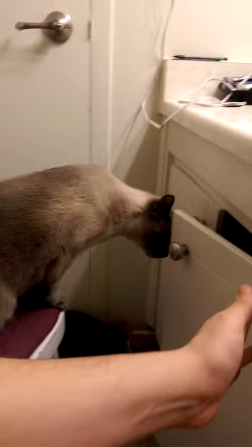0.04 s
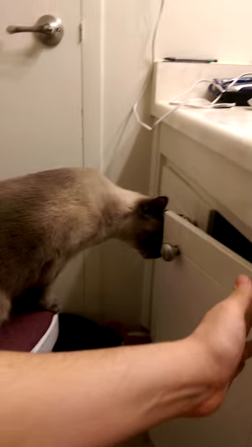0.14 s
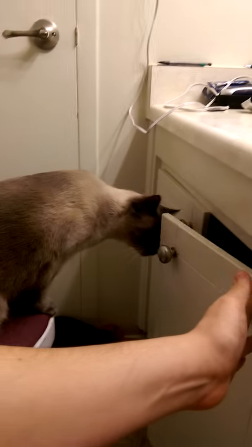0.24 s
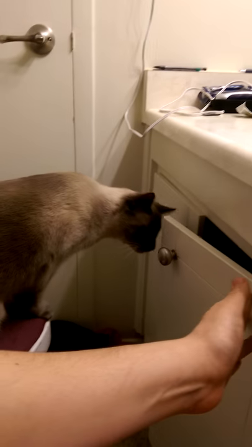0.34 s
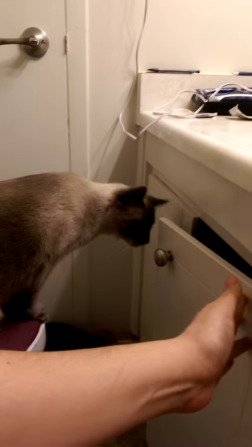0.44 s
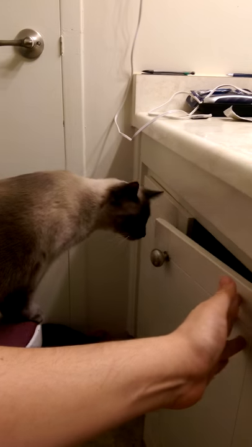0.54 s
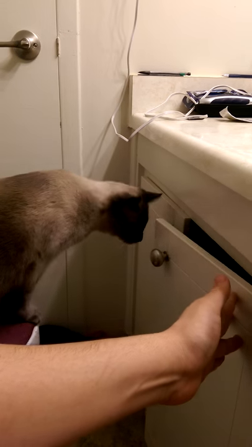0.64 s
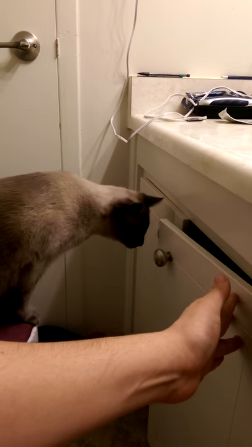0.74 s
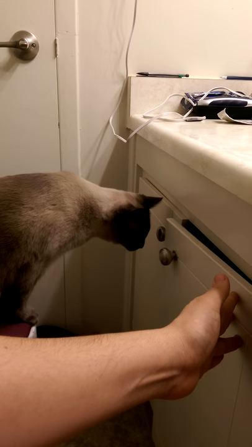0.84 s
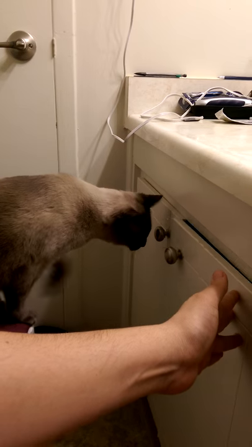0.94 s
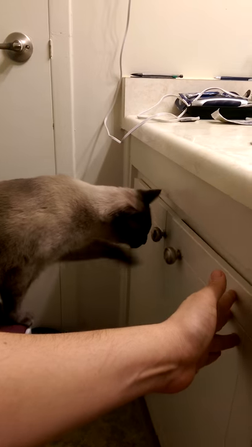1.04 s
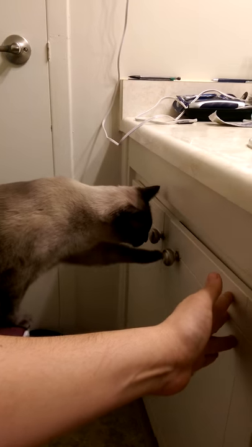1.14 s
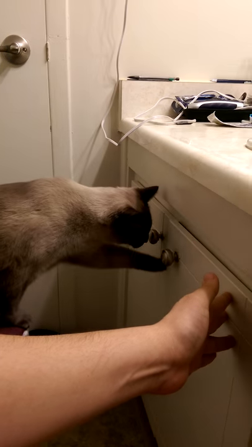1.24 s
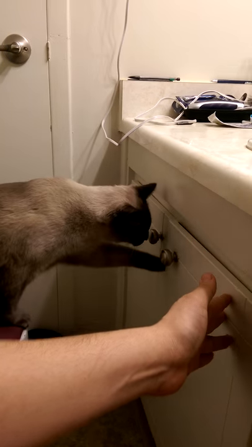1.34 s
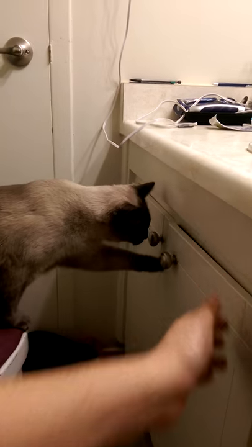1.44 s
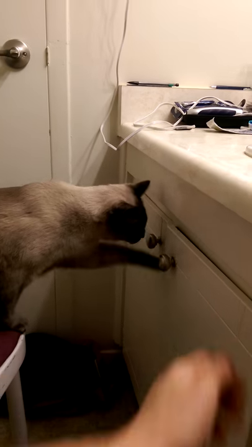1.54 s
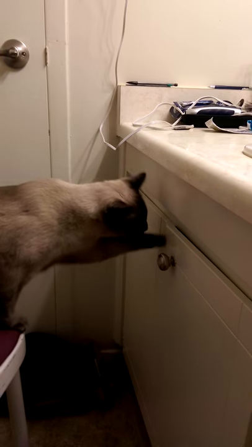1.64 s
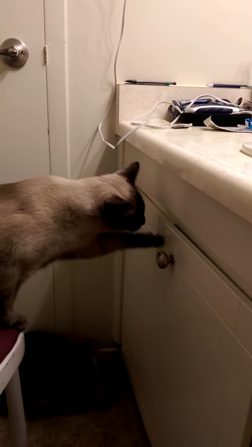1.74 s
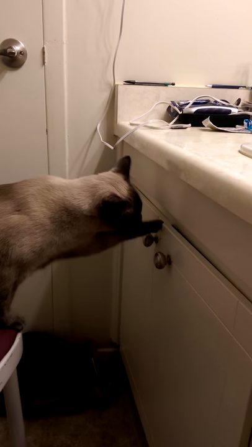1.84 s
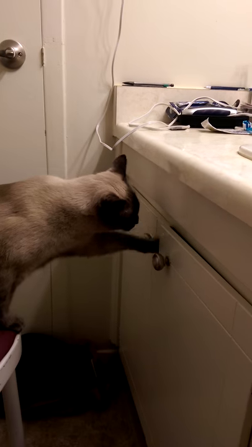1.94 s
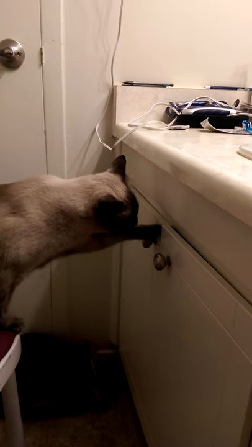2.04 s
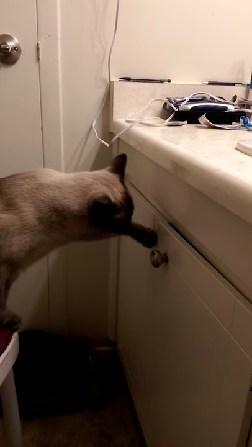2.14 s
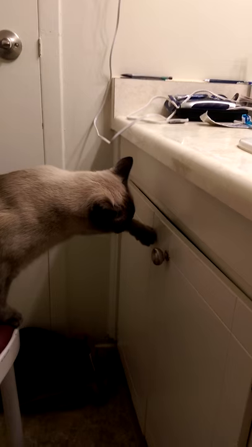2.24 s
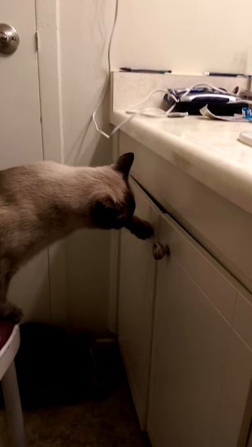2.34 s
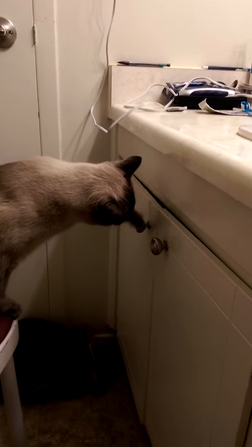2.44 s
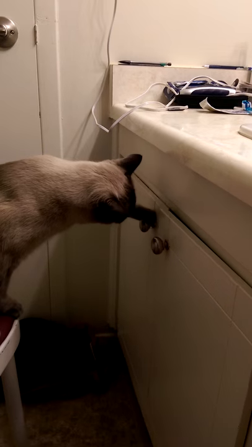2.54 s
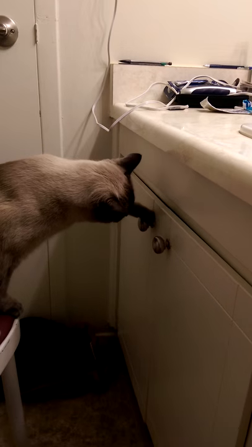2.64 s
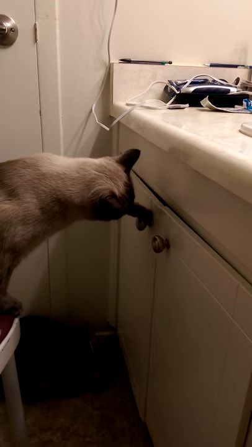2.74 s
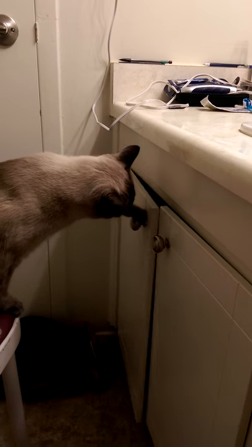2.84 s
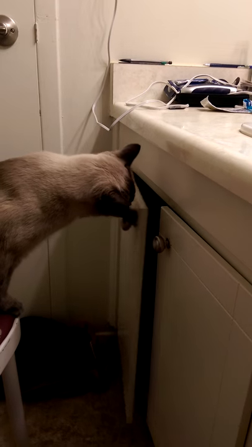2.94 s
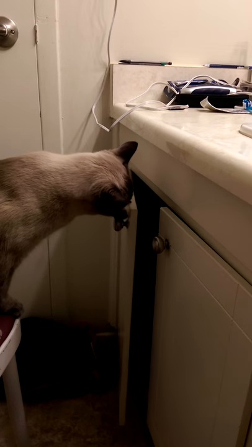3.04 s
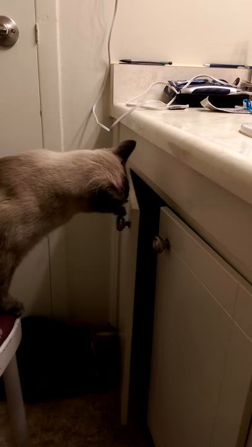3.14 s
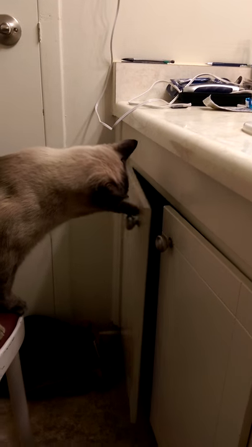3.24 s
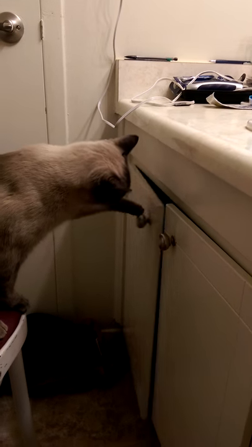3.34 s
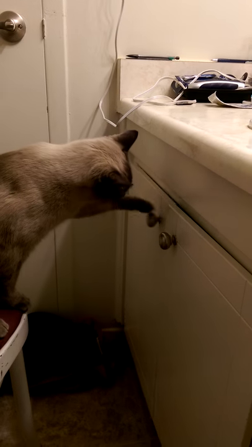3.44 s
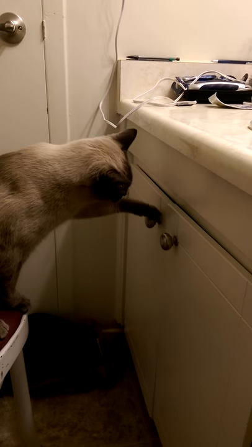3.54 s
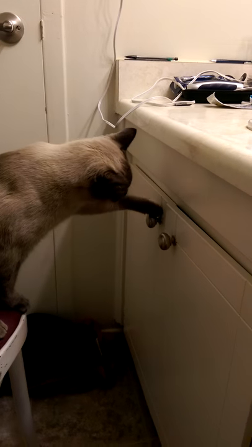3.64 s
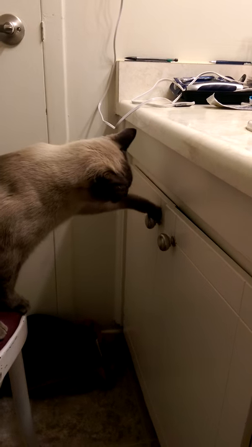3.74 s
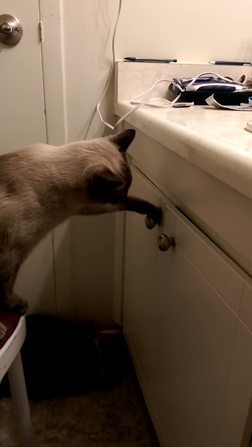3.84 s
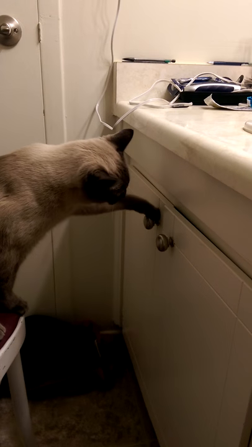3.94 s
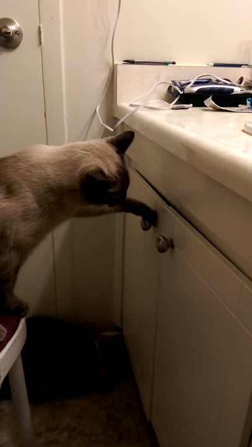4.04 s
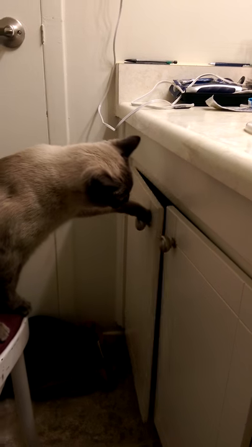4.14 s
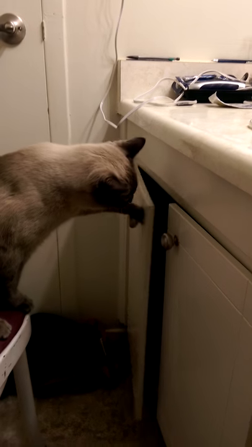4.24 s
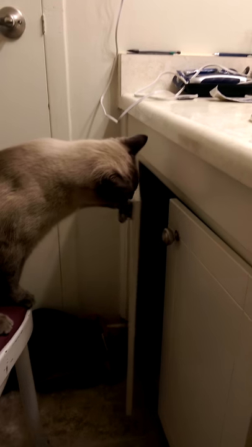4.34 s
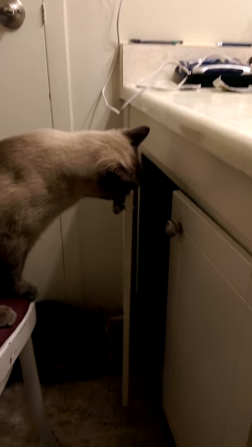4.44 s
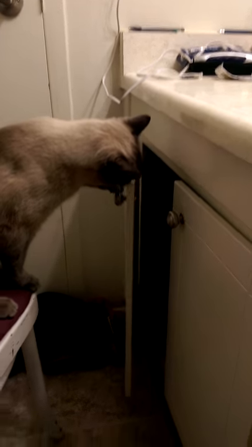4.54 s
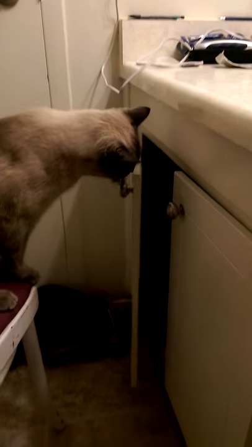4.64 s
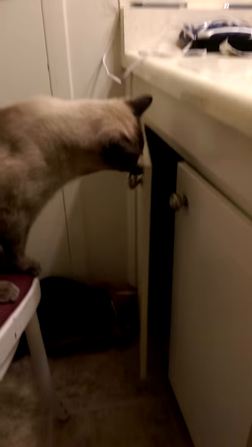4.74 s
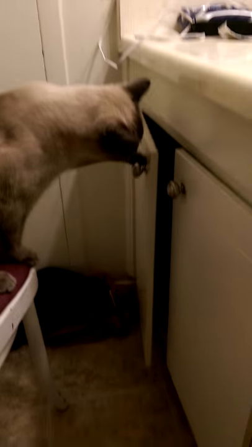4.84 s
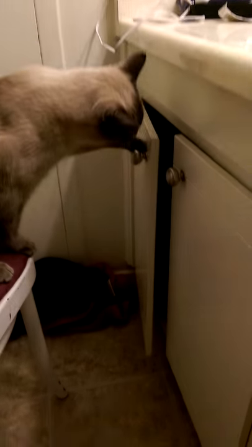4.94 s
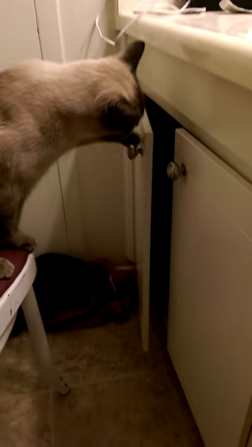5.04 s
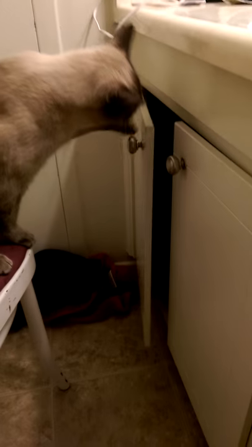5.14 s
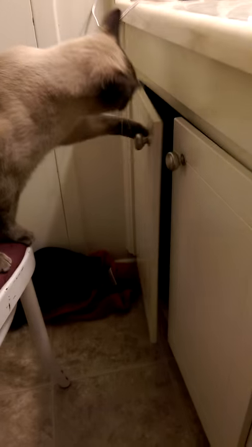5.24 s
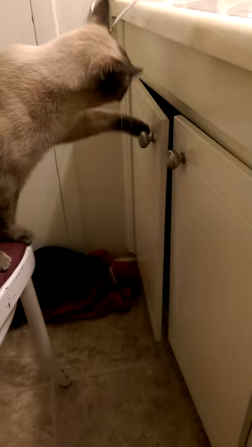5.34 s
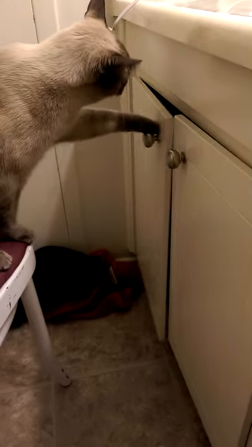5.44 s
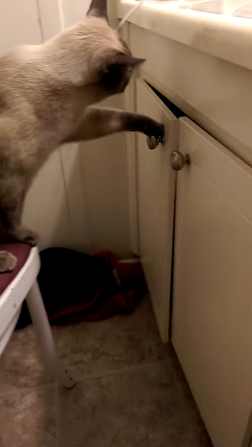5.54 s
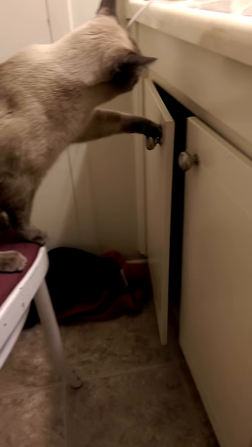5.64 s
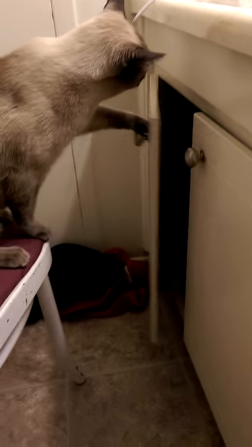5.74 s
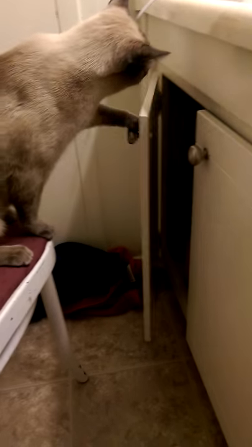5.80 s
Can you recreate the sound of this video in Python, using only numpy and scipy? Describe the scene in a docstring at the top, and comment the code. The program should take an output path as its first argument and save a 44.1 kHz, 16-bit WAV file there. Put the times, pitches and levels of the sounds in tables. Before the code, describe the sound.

A small tiled bathroom, captured by a phone near wooden cupboards; the left side is brighter. Low house rumble and smooth faint hiss run throughout, dipping slightly in quiet moments. A barely audible soft touch on the door comes at 0.3 s, with tiny ticks to 0.6. At 1.07 s the hand-pushed near door shuts with a dull, woody thump and a click, followed by weaker bounces at 1.16 and 1.22. Faint ticks and a tiny hinge creak follow around 1.4 to 1.65. A very light tap at 2.24 precedes a loud hollow bang at 2.6 as the cat paws the far door. Small claw ticks and dry creaks lead to the loudest thunk at 3.54, then softer knocks at 3.73 and 3.88 and a light one at 3.96. Each has a hard snap, boxy cabinet ring and short tile reverberation. Afterwards only faint creaks and ticks remain, around 4.2, 5.1 to 5.2 and 5.6.

```python
"""A small tiled bathroom: two wooden cupboard doors knock on their frame, pushed by a hand (near) and pawed by a cat (far).
Each blow rings decaying modes of door and hollow cabinet, with a noise snap and dying noise from tiles and doorway.
Claws tick as short noise contacts, the hinge creaks as narrow noise slips, and house rumble and hiss lie beneath.
A phone hears it through two ports: the left one faces the door and is brighter; its suppressor turns quiet moments down."""
import sys
import numpy as np
from scipy import signal
from scipy.fft import rfft, irfft, next_fast_len
from scipy.io import wavfile
from scipy.ndimage import uniform_filter1d, minimum_filter1d, map_coordinates

SR = 44100
rng = np.random.default_rng(int(sys.argv[2]) if len(sys.argv) > 2 else 0)


def makeup_ratio(level_db):
    """Linear amplitude ratio for a level in decibels (20 dB per factor of ten)."""
    decades = np.asarray(level_db, float) / 20
    return 10 ** decades


def transcribe(u):
    """Save the signal u as a 16-bit wav file named by the first command-line argument.

    u: samples, shape (n,) or (channels, n), limited to [-1, 1]; the rate is SR.
    q: integer samples, one column per channel.
    """
    v = np.clip(np.atleast_2d(u).T, -1, 1)
    q = np.round(v * 32767).astype(np.int16)
    wavfile.write(sys.argv[1], SR, q)


N = 258867

# Likeness of left and right in the noise of near sounds. Each row: frequency in Hz, likeness (1 = the same).
NEAR_ALIKE = [(60, 0.83), (200, 1), (400, 0.0057), (900, 0.82), (2000, 0.13), (10000, 0.38)]


def mode_ring(modes, weight, panel_hz, lift_db):
    """Door and cabinet modes swell at once and die as sines; the place struck favours one panel mode."""
    t = np.arange(SR) / SR
    hz, mode_db, t60 = np.transpose(modes)[:, :, None]
    spot_db = lift_db * np.exp(-(np.log(hz / panel_hz) / .13) ** 2)
    strength_db = mode_db + along(weight, hz) + spot_db + rng.normal(0, 1.5, hz.shape)
    # the ports hear high modes out of step
    lag = rng.normal(1.2, .6, hz.shape) * np.minimum(hz / 900, 1.5) * [[[.5]], [[-.5]]]
    # the cabinet air needs a moment to build
    swell = 1 - np.exp(-t / np.minimum(3.5 / hz, .009))
    # the loose door blurs its high modes
    wander = np.cumsum(rng.standard_normal((len(hz), SR)), axis=1) * hz * 2.4e-5
    sines = np.sin(2 * np.pi * hz * t + lag + wander)
    return (makeup_ratio(strength_db - 60 * t / t60) * swell * sines).sum(axis=1)


def first_snap(colour):
    """A hard contact and a brief rattle, thinned in the bass, go straight at the left port."""
    t60 = 0.022  # s
    burst = makeup_ratio(-60 * np.arange(2000) / SR / t60) * rng.standard_normal((2, 2000))
    burst[:, 20] += 3  # one hard contact leads the rattle
    led_in = np.pad(burst, ((0, 0), (SR // 200, 0)))  # 5 ms of room for the filter to ring ahead
    snap = filtered(led_in, lambda f: colour(f) / (1 + (900 / (f + 1)) ** 2))
    return snap * makeup_ratio([[2], [-9]])


def tile_answer(colour):
    """The tiles scatter the crack into noise whose bands die at their own speeds."""
    # Decay of the tiled room. Each row: frequency in Hz, t60 in s.
    tile_decay = [(40, 0.83), (150, 0.61), (500, 0.28), (1000, 0.14), (2500, 0.13), (6400, 0.14),
                  (14000, 0.078)]
    noise = pair(SR, colour, NEAR_ALIKE)
    return dying(noise, lambda f: along(tile_decay, f), rise=0.0043)


def doorway_answer(colour):
    """Late sound returns from beyond the doorway, slower to rise and thin in the middle."""
    # Decay beyond the doorway. Each row: frequency in Hz, t60 in s.
    hall_decay = [(60, .9), (300, 0.39), (1000, 0.37), (8000, 0.45)]
    thinning = [(300, 1.0), (2500, -6), (9000, -1)]  # Hz, dB
    noise = pair(SR, lambda f: colour(f) * makeup_ratio(along(thinning, f)), NEAR_ALIKE)
    return dying(noise, lambda f: along(hall_decay, f), rise=0.016)


def door_blows(blows, modes, lift_db):
    """Each blow rings the modes at new strengths, snaps once and fills the room with its crack."""
    # Colour of the blow ahead of its own lifts. Each row: frequency in Hz, level in dB per Hz.
    crack = [(20, -43.5), (45, -12), (90, -8), (150, -9), (250, -9.5), (400, -5), (560, -10.5), (870, -9),
             (1120, -9), (1550, -12), (1900, -9.5), (3260, -15.5), (4370, -24), (5500, -33.5),
             (8500, -32.5), (10500, -36.5), (13000, -39), (15800, -54)]
    boom_db, upper_bass_db = 1, 2.5  # below 90 Hz and at 450 Hz, over the bass lift
    edge_share = .55  # share of the treble lift reached at 4 kHz
    out = np.zeros((2, N + SR))
    for struck, db, bass_db, treble_db, panel_hz in blows:
        weight = [(90, bass_db + boom_db), (150, bass_db), (450, bass_db + upper_bass_db), (900, 0),
                  (2500, 0.00047), (4000, edge_share * treble_db), (6000, treble_db)]
        colour = lambda f: makeup_ratio(along(crack, f) + along(weight, f))
        s = struck + .001  # travel time to the phone
        add(out, s, makeup_ratio(db - 4) * mode_ring(modes, weight, panel_hz, lift_db))
        add(out, s, makeup_ratio(db - 7) * tile_answer(colour))
        add(out, s - 1 / 200, makeup_ratio(db + 18) * first_snap(colour))  # early by its lead-in
        add(out, s, makeup_ratio(db - 30) * doorway_answer(colour))
    return out[:, :N]


def far_door():
    """The pawed far door knocks on its frame and rings with its cabinet."""
    # Blows on the frame. Each row: start in seconds, level in dB ahead of the layer trims,
    # bass lift in dB, treble lift in dB, favoured panel pitch in Hz.
    knocks = [(2.2358, -37, -2.5, -1, 1900), (2.6125, -11.5, -2, 1, 260), (3.5405, -9, -2, 3, 143.9),
              (3.7292, -14.5, -3.5, -0.5, 88), (3.8836, -15.5, -3.5, -1, 87),
              (3.9598, -24.5, -3, -7.5, 210)]
    # Door and cabinet modes. Each row: pitch in Hz, level in dB ahead of each blow's lifts and scatter, t60 in s.
    far_modes = [(58.7, -13, 0.53), (87, -9, 0.29), (109.8, -7.5, 0.24), (154.55, -3, .35),
                 (190, -13.5, 0.39), (210, -7.5, .45), (253, -5.5, .3), (301.3, -7.5, 0.17),
                 (323.5, -5, 0.16), (354, -6.5, 0.12), (432, -12.5, 0.28), (533.4, -19.5, 0.36),
                 (724, -2.5, 0.065), (753, -19.5, 0.23), (803, -9.5, 0.17), (951, -15.5, 0.099),
                 (983, -8.5, 0.18), (1303, -14, .15), (1382, -13.5, .17), (1810, -13, 0.14),
                 (2024, -13.5, 0.097), (2070, -15, 0.089), (2418, -8, 0.17), (2830, -18.5, 0.11),
                 (2997, -12, 0.064), (3310, -8.5, 0.053)]
    return door_blows(knocks, far_modes, lift_db=5.5)


def near_door():
    """The hand-pushed near door rings its own modes; a soft touch in its middle strongly favours one."""
    # Pushes onto the frame. Each row: start in seconds, level in dB ahead of the layer trims,
    # bass lift in dB, treble lift in dB, favoured panel pitch in Hz.
    pushes = [(1.0678, -15.5, 1.5, -11, 190), (1.161, -25.5, -2.5, -5, 195), (1.2165, -39, 5.5, -7, 190)]
    # A soft touch in the middle of the door. Each row: start in seconds, level in dB ahead of the layer trims,
    # bass lift in dB, treble lift in dB, favoured panel pitch in Hz.
    nudge = [(.302, -75, 19.5, 26, 209)]
    # Door modes. Each row: pitch in Hz, level in dB ahead of each blow's lifts and scatter, t60 in s.
    near_modes = [(60.25, -27, 1), (84, -20, 0.25), (115.1, 0, 0.21), (154.6, -12.5, 0.69),
                  (194.2, -1.5, 0.2), (211.9, -7, 0.37), (253.6, -13.5, 0.38), (307, -25, 0.044),
                  (369.4, -6, 0.25), (388.7, -14.5, 0.13), (482, -19.5, 0.41), (649, -3.5, 0.026),
                  (769, -11, 0.18), (974, -9, 0.16), (1303, -15, 0.12), (1576, -15.5, 0.22),
                  (1750, -12.5, 0.11), (1680, -23.5, 0.099), (2035, -13.5, 0.17), (2260, -15.5, 0.21),
                  (3200, -17, 0.082)]
    return door_blows(pushes, near_modes, lift_db=2.5) + door_blows(nudge, near_modes, lift_db=18)


def claws():
    """Tiny dry contacts of claw, knob and catch: a quick click of noise with a short trail of room."""
    # Contacts close to the phone. Each row: start in seconds, level in dB at the start of the trail,
    # treble in dB at 9 kHz in the contact's colour.
    ticks = [(0.4008, -61, -8.5), (0.533, -70.5, -6), (0.625, -65.5, -13), (1.0185, -64.5, -13),
             (1.072, -44.5, 1.5), (1.191, -61.5, 2.5), (1.2615, -64, -4), (1.413, -64, -8),
             (1.6435, -72, -8), (2.5245, -64, -12), (2.742, -66, -4), (2.764, -68, 8), (2.9778, -67.5, -2),
             (3.2143, -63, -15.5), (3.519, -64.5, -1), (3.6703, -54.5, -11), (5.2086, -63.5, -9.5),
             (5.6394, -72, -2.5)]
    trail_t60, click_t60 = 0.1, .025  # s
    click_db = -1  # over the trail
    out = np.zeros((2, N + SR))
    t = np.arange(SR // 8) / SR
    for s, db, treble_db in ticks:
        colour = [(500, -9.5), (1500, 3), (2500, 3.5), (4500, -2), (5500, -10.5),
                  (9000, treble_db), (15000, treble_db - 7.5)]  # Hz, dB
        noise = pair(SR // 8, lambda f: makeup_ratio(along(colour, f)), NEAR_ALIKE)
        trail = dying(noise, lambda f: 0 * f + trail_t60, rise=0.00043)
        click = makeup_ratio(click_db - 60 * t / click_t60) * noise[:, ::-1]
        add(out, s, makeup_ratio(db) * trail)
        add(out, s, makeup_ratio(db) * click)
    return out[:, :N]


def hinge():
    """Short rough slips: noise through a narrow resonance of the hinge, swelling and fading."""
    # Slips. Each row: start in seconds, level in dB ahead of the fades, pitch in Hz, length in seconds.
    creaks = [(1.535, -66, 2110, 0.065), (2.146, -69, 1550, 0.024), (2.431, -75, 1720, 0.07),
              (3.1, -72, 1680, 0.04), (3.135, -77, 1640, 0.053), (3.398, -66.5, 1722, 0.041),
              (4.234, -65.5, 1640, 0.041), (5.131, -68, 1750, 0.053)]
    out = np.zeros((2, N + SR))
    for s, db, hz, length in creaks:
        n = max(round(length * SR), 200)
        noise = pair(n, lambda f: 1 / (1 + ((f - hz) / 400) ** 2), NEAR_ALIKE)
        add(out, s, makeup_ratio(db) * noise * np.hanning(n))
    return out[:, :N]


def air():
    """House rumble is low noise whose level wavers a little; a smooth hiss lies over it."""
    # Colour of the rumble. Each row: frequency in Hz, level in dB per Hz ahead of levelling.
    rumble_colour = [(15, -46.5), (25, -13.5), (45, -5), (70, -2.5), (117, -2.5), (172, -4), (204, -1.5),
                     (271, -7), (378, -8.5), (480, -10.5), (1200, -25.5), (1800, -56.5)]
    # Colour of the hiss. Each row: frequency in Hz, level in dB per Hz ahead of levelling.
    hiss_colour = [(290, -29.5), (500, -11.5), (1140, -6), (1610, -8), (1760, -7.5), (3320, -11),
                   (5050, -12), (15800, -16)]
    # Likeness of left and right in the air. Each row: frequency in Hz, likeness (1 = the same).
    air_likeness = [(60, 1), (250, 0.99), (800, 0), (3000, .0)]
    rumble_db, hiss_db = -68, -71.5  # ahead of the ports and suppressor
    waver = map_coordinates(rng.standard_normal(60), [np.arange(N) / SR * 8])  # 8 random points a second
    rumble = pair(N, lambda f: makeup_ratio(along(rumble_colour, f)), air_likeness)
    hiss = pair(N, lambda f: makeup_ratio(along(hiss_colour, f)), air_likeness)
    return makeup_ratio(rumble_db + 0.73 * waver) * rumble + makeup_ratio(hiss_db) * hiss


def add(out, s, x):
    """Mix x into out from time s."""
    out[:, round(s * SR):][:, :x.shape[1]] += x


def along(points, hz):
    """Read (Hz, value) points on a log frequency axis."""
    f, v = np.transpose(points)
    return np.interp(np.log(hz + 1), np.log(f + 1), v)


def filtered(x, response):
    """Multiply the spectrum of x by a response of frequency, without phase shift."""
    n = x.shape[-1]
    m = next_fast_len(n + 8192)
    return irfft(rfft(x, m) * response(np.fft.rfftfreq(m, 1 / SR)), m)[..., :n]


def pair(n, gain, alike):
    """Stereo noise of a given colour and left-right likeness, from mid and side; mid rms 1."""
    turn = lambda hz: np.arccos(np.clip(along(alike, hz), -1, 1)) / 2
    noise = rng.standard_normal((2, n))
    mid, side = filtered(noise, lambda hz: gain(hz) * [np.cos(turn(hz)), np.sin(turn(hz))])
    return np.array([mid + side, mid - side]) / np.std(mid)


def dying(x, t60_of, rise):
    """Every band of a noise dies at its own speed after a sharp start (rise in s)."""
    hz, t, z = signal.stft(x, SR, nperseg=256)
    decay = makeup_ratio(-60 * t / t60_of(hz)[:, None])
    tail = signal.istft(z * decay, SR, nperseg=256)[1][:, :x.shape[1]]
    return tail * (1 - np.exp(-np.arange(x.shape[1]) / SR / rise))


def ports(x, balance):
    """The two ports hear different levels by frequency; half of the difference goes to each side."""
    return filtered(x, lambda hz: makeup_ratio(np.outer([.5, -.5], along(balance, hz))))


def suppressor(x):
    """Full gain while the sound is loud and for a moment after; otherwise a few dB down."""
    open_db, soft_db, cut_db = -56.5, 1, 4  # level that opens it, knee, cut when shut
    hold = round(.33 * SR)  # .33 s
    power = np.abs(uniform_filter1d(x.mean(axis=0) ** 2, size=SR // 40))
    level_db = 10 * np.log10(power + 1e-12)
    shut = .5 - .5 * np.tanh((level_db - open_db) / soft_db)
    # the most open moment of the last hold time counts
    held = minimum_filter1d(np.pad(shut, (hold // 2, 0), constant_values=1)[:N], size=hold)
    return x * makeup_ratio(-cut_db * uniform_filter1d(held, size=SR // 30))


def scene():
    """Doors, claws and hinge at the ports, over the air of the room."""
    # Port balance for near sounds. Each row: frequency in Hz, left over right in dB.
    near_balance = [(60, 3), (130, 1), (290, 0), (640, 0), (1410, 0.5), (3100, 2.5), (5000, 8.5),
                    (6800, 14), (8500, 18), (10000, 16), (12000, 9.5), (15000, 3.5)]
    # Port balance for the air. Each row: frequency in Hz, left over right in dB.
    air_balance = [(60, 4), (180, 4), (550, 2.5), (1650, 3.5), (4970, 4.5), (15000, 3)]
    near = far_door() + near_door() + claws() + hinge()
    return ports(near, near_balance) + ports(air(), air_balance)


def low_pass(x):
    """Removes everything above the highest recorded frequency."""
    return signal.sosfilt(signal.butter(12, 16480, fs=SR, output="sos"), x)


def record(dry):
    """The phone: suppressor, an input stage that rounds off the loudest peaks, and a band limit."""
    ceiling, top_hz = .9, 15850  # full scale of the input stage; highest frequency kept
    x = suppressor(dry)
    x = x / (1 + (x / ceiling) ** 4) ** .25
    mix = filtered(x, lambda hz: hz < top_hz)
    return low_pass(mix)


dry = scene()
out = record(dry)
transcribe(out)
```